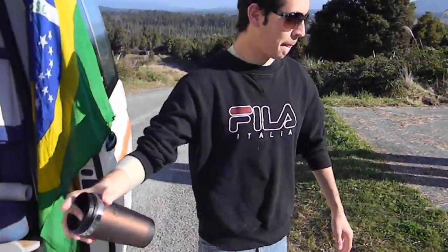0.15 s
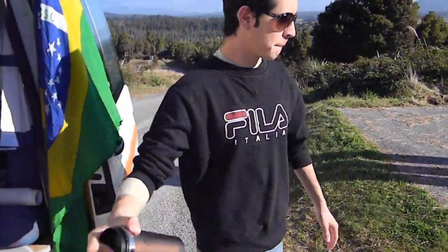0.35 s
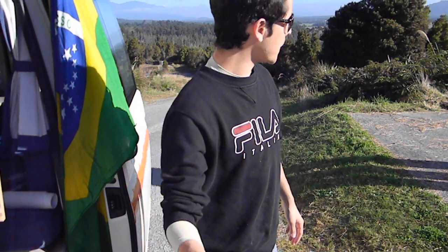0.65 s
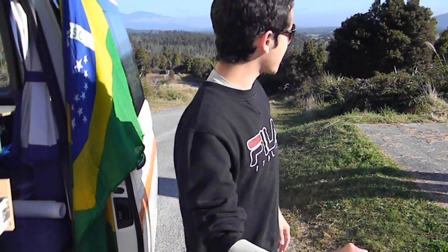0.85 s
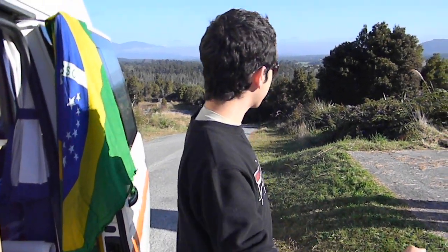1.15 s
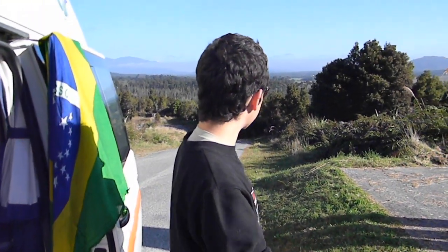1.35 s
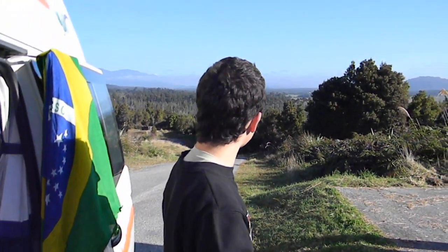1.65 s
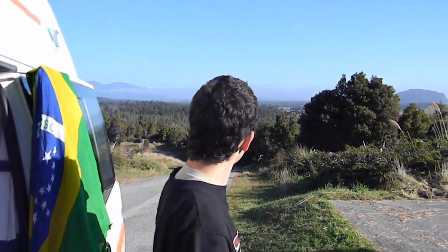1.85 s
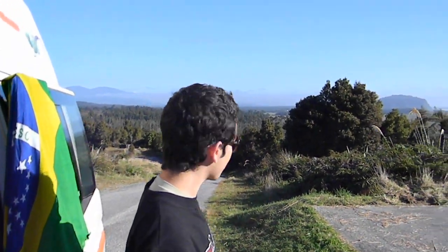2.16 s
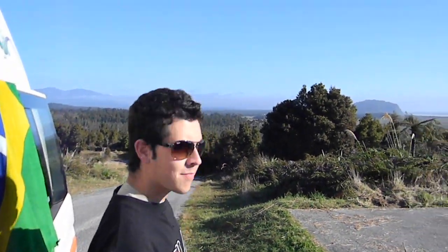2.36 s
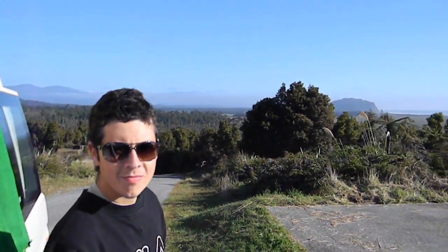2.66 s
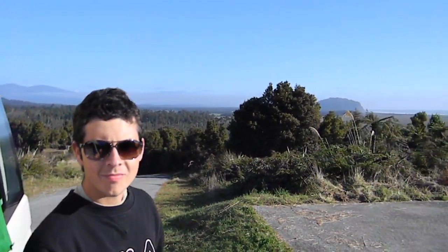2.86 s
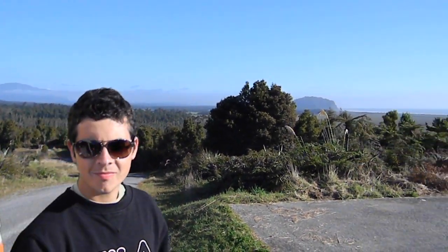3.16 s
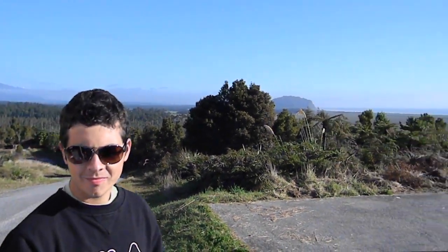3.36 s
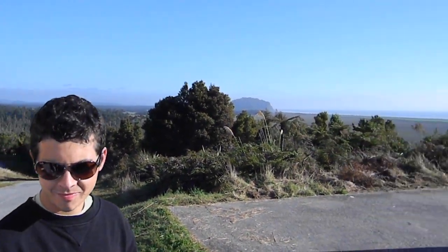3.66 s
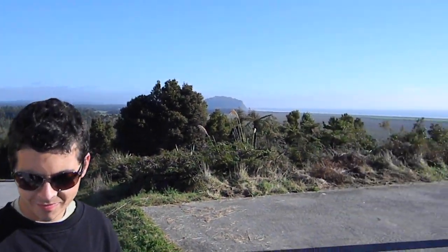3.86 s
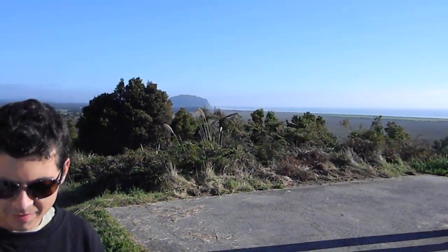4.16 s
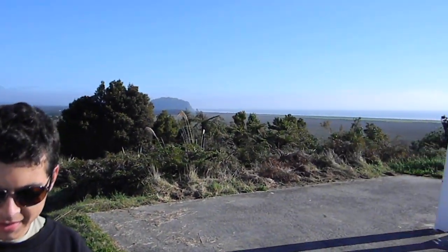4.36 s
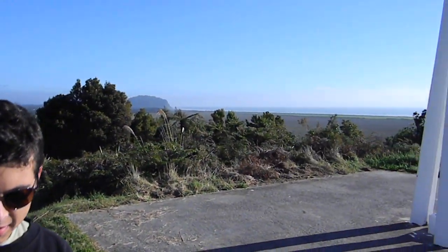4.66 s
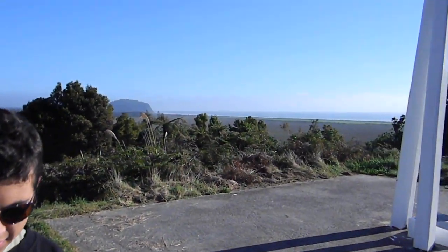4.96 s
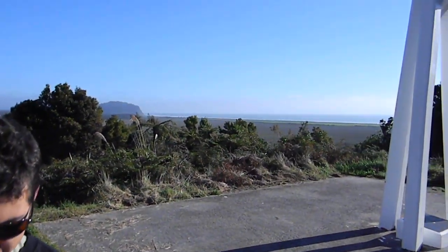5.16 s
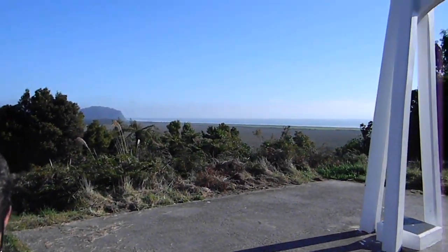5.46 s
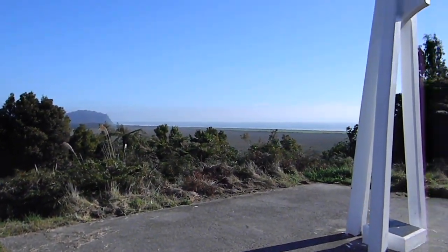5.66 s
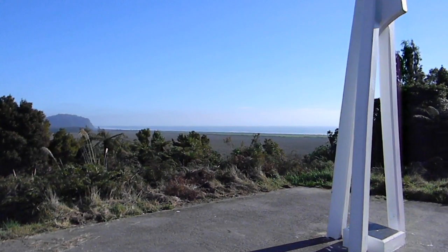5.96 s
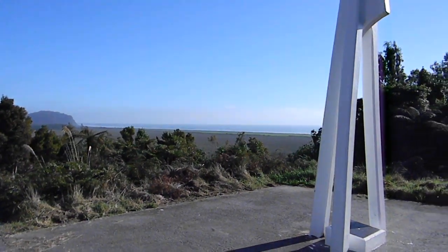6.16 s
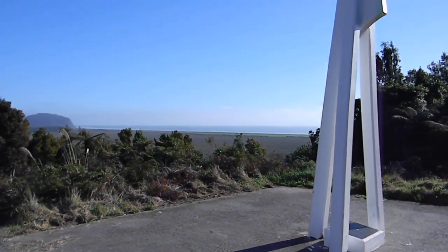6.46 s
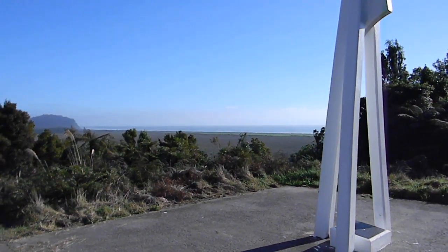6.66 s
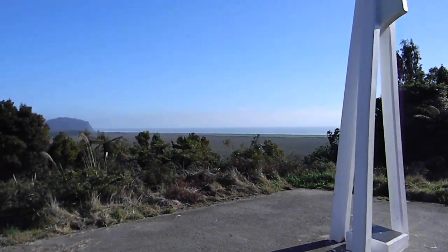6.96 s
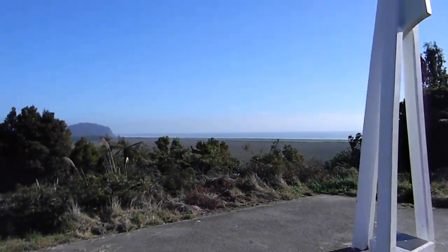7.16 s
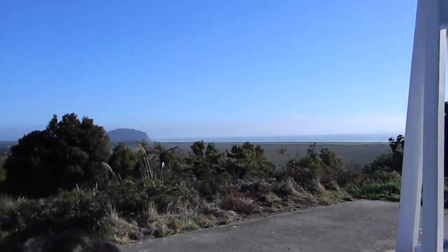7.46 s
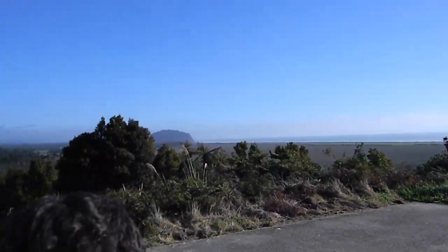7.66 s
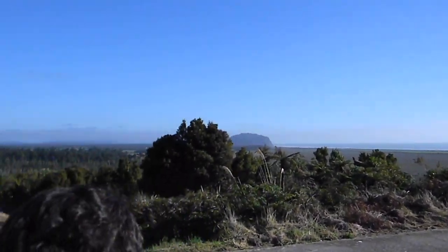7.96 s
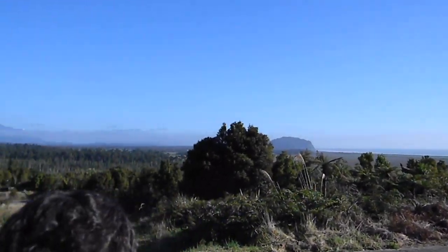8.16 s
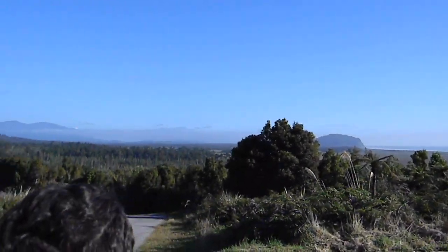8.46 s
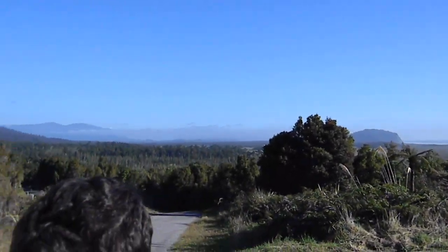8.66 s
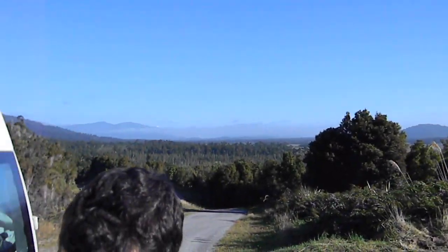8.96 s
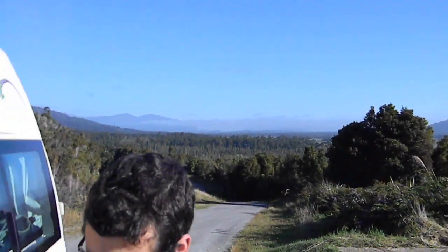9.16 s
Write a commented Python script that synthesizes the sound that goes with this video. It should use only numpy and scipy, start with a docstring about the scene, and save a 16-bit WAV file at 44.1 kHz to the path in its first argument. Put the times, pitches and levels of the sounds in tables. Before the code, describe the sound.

Very close to a handheld stereo microphone outdoors, ice and liquid are shaken hard in a closed metal shaker, about five sharp crashes a second, each with a softer return. After four seconds it stops. A few gurgling sloshes and dull handling knocks follow over light wind and a faint distant bird trill, then a last bubbling swirl with clinking ice.

```python
"""Ice and drink are shaken hard in a closed metal shaker, outdoors, close to a handheld camera's two ports.
On each stroke one chunk strikes the end, the rest shower after it, the drink follows and the return is softer.
Then come slow, gurgling sloshes, dull knocks and a last swirl, over light wind and a faint, far, high trill.
Ice and drink are random collisions filtered by the shaker's resonances; bubbles and trill are gliding sines;
wind is filtered noise, partly alike at the two ports."""
import sys
import numpy as np
from scipy import signal
from scipy.fft import irfft
from scipy.io import wavfile
from scipy.ndimage import uniform_filter1d

SR = 44100
rng = np.random.default_rng(int(sys.argv[2]) if len(sys.argv) > 2 else 0)


def wav_record(signal):
    """Record a signal, one row per channel, as 16-bit PCM in the file named by sys.argv[1]."""
    frames = np.transpose(np.atleast_2d(signal))
    bounded = np.clip(frames, -1, 1)
    # unit amplitude maps onto the largest positive 16-bit level
    quanta = np.round(bounded * 32767).astype(np.int16)
    wavfile.write(sys.argv[1], SR, quanta)


N = 411012
TAPS = 2048  # length of filters, clacks and wind frames, in samples
HZ = np.fft.rfftfreq(TAPS, 1 / SR)

# shakes, one row each, levels ahead of each layer's trim: (first chunk strikes [s], chunk level [dB],
# shower level [dB], treble [dB], puff of air level [dB], load lands back [s], return level [dB])
STROKES = [(-.09, -10, -21, 0, -50, .003, -25), (.119, -14, -21.5, 0, -55, .212, -29.5),
           (0.3202, -15, -20, 6, -46, .424, -29), (0.522, -14, -21.5, -1, -47, .637, -28.5),
           (0.7313, -13, -20, 0.5, -50, .859, -27), (0.9605, -17, -19.5, 2, -42, 1.075, -27),
           (1.1715, -15, -24, 1, -38, 1.276, -27.5), (1.3899, -13, -21.5, 1.5, -58, 1.486, -25.5),
           (1.5952, -19.5, -20, 3, -56, 1.704, -27.5), (1.8218, -17, -21.5, -2.5, -58, 1.924, -29),
           (2.0361, -16.5, -24, 7.5, -36.5, 2.147, -28.5), (2.2533, -18.5, -23.5, -6, -58, 2.352, -28.5),
           (2.4626, -15, -22, 3, -61, 2.56, -28.5), (2.6656, -15, -25, 4, -44, 2.768, -30),
           (2.885, -15, -21, 1, -34, 2.99, -31.5), (3.09, -18.5, -21.5, 5, -44, 3.196, -29),
           (3.3112, -15.5, -23, 4.5, -43, 3.4, -30), (3.5118, -16.5, -24, 0, -42.5, 3.605, -29),
           (3.7217, -19.5, -23.5, 0, -52, 3.813, -29), (3.9216, -16.5, -21, 0.5, -31.5, 4.008, -27),
           (4.117, -17.5, -23, -0.5, -38, 4.214, -30)]
# slow sloshes, each trapping air, levels ahead of each layer's trim:
# (time [s], level [dB], length [s], air pocket resonance [Hz], bubble level [dB])
SLOSH_EVENTS = [(4.845, -29, 0.028, 1450, -35), (4.897, -34.5, 0.016, 1220, -48),
                (5.075, -32, 0.025, 1770, -23), (5.194, -28.5, .024, 1264, -35),
                (5.308, -33, 0.034, 1250, -27), (5.348, -38, 0.048, 1240, -28),
                (5.393, -39.5, 0.035, 1256, -19.5), (5.429, -36, .045, 1350, -23),
                (8.173, -35, 0.033, 2510, -14.5), (8.233, -30, 0.034, 1950, -24),
                (8.321, -30.5, 0.066, 2430, -27), (8.389, -29.5, .04, 1380, -18.5),
                (8.42, -35.5, .04, 2600, -32), (8.496, -34.5, 0.039, 850, -21),
                (8.531, -30.5, 0.059, 827, -17.5), (8.581, -33, 0.024, 1050, -21),
                (8.635, -30.5, 0.032, 985, -35), (8.698, -24.5, .06, 856, -14), (8.741, -31, .05, 915, -12),
                (8.779, -24.5, 0.042, 1036, -17), (8.805, -32, 0.031, 1480, -16),
                (8.832, -25, 0.049, 1030, -19), (8.901, -31.5, .06, 1390, -15.5),
                (8.96, -29, .04, 1550, -19), (9.024, -31, 0.046, 1440, -23), (9.2, -30.5, 0.054, 1470, -25)]
SLOSH_RISE_SHARE = 0.36  # share of a slosh spent swelling
# relative spectrum of dull handling: (frequency [Hz], level per Hz [dB])
DULL_SPECTRUM = [(80, -23), (200, -3), (290, -8), (400, 4.5), (660, -1.5), (900, -6), (1450, -10),
                 (2100, -16.5), (16000, -53)]


def gain_of(db):
    """Amplitude factor of a level in dB."""
    return 10 ** (np.asarray(db) / 20)


def evened(x):
    """The signal scaled to unit power."""
    return x / np.sqrt(np.mean(x ** 2) + 1e-20)


def read(points, hz=HZ):
    """A spectrum joined by straight lines on a log-frequency axis."""
    f, value = np.transpose(points)
    return np.interp(np.log(hz + 1), np.log(f + 1), value)


def curve(points):
    """A control joined by straight lines in time."""
    return np.interp(np.arange(N) / SR, *np.transpose(points))


def add(mix, s, sound):
    """Lay a sound into the mix at time s, cutting what falls outside."""
    at = round(s * SR)
    sound = sound[:, max(-at, 0):]
    part = mix[:, max(at, 0):][:, :sound.shape[1]]
    part += sound[:, :part.shape[1]]


def bump(hz, width, db):
    """The dB curve of one resonance."""
    return db / (1 + (2 * (HZ - hz) / width) ** 2)


def tilt(bass_db, treble_db):
    """Heavy lumps add bass, sharp corners add treble."""
    return read([(500, bass_db), (1100, 0), (2600, 0), (6000, treble_db)])


def colour(x, db, s):
    """A causal filter of unit power, heard at two ports with the level and delay between them at time s."""
    # where the shaker is: (time [s], left over right [dB], lag of left [ms])
    shaker_place = [(0, -1, 0.042), (.7, -3, 0.024), (1.048, -6, 0.17), (2.3, -3.5, 0.16), (2.6, -1, 0.039),
                    (9.3, 0.6, 0)]
    # microphone pair: (frequency [Hz], phase by which left leads [rad])
    port_lead = [(20, -3), (340, -.5), (950, 0.06), (2300, 0.65), (4500, 2.22), (9000, 1.5), (16000, 1.5)]
    # microphone pair: (frequency [Hz], left over right [dB])
    port_balance = [(100, 1.5), (400, 3), (1300, 0), (2500, -0.6), (4400, -1.5), (8000, 4), (15000, 4.5)]
    times, *place = np.transpose(shaker_place)
    pan_db, lag_ms = (np.interp(s, times, column) for column in place)
    log_gain = np.log(gain_of(np.maximum(db - db.max(), -100)))
    # the minimum phase follows from the log gain
    phase = -signal.hilbert(np.r_[log_gain, log_gain[-2:0:-1]]).imag[:len(HZ)]
    lead = read(port_lead) - 2 * np.pi * HZ * lag_ms / 1000
    side = np.array([[.5], [-.5]])  # half of each difference goes to each port
    port_gain = gain_of(side * (pan_db + read(port_balance)))
    ports = np.exp(log_gain + 1j * (phase + side * lead)) * port_gain
    margin = 32  # samples of room for the port that leads
    taps = np.roll(irfft(ports), margin, axis=1)
    taps /= np.sqrt(np.sum(taps ** 2) / 2)
    return signal.oaconvolve(x, taps, axes=1)[:, margin:]


def clack(ring_s, direct, same, tail_db=-14, tail_s=0.009, chunk_db=-9, chunk_s=0.008, count=8):
    """One collision: a sharp contact, a dense ring of the vessel, the chunk's own modes and weak reflections."""
    t = np.arange(TAPS) / SR
    shared, own, late = rng.standard_normal((3, 2, TAPS))
    same = np.clip(same, 0, 1)  # share of the ring's power common to both ports
    ring = np.sqrt(same) * shared[0] + np.sqrt(1 - same) * own
    ring = evened(ring * np.exp(-t / ring_s))
    contact = evened(1. * (t == 0))
    mode_hz = rng.uniform(1532, 15000, (count, 1))
    modes = np.sin(2 * np.pi * mode_hz * t).sum(0) * np.exp(-t / chunk_s)
    sound = ring + direct * contact + gain_of(chunk_db) * evened(modes)
    reflections = evened(late * np.exp(-t / tail_s))
    return evened(sound + gain_of(tail_db) * reflections) / np.sqrt(TAPS)


def rattle(envelope, per_s, spread_db, ring_s, same, fizz_db=-6, count=4):
    """Random collisions of several chunks, mostly small and a few large, in a fine fizz of slush."""
    n = len(envelope)
    size = gain_of(spread_db * np.minimum(rng.exponential(1, n), 3.5)) * rng.choice([-1, 1], n)
    clicks = size * (rng.random(n) < per_s / SR) * envelope
    clicks = evened(clicks) * np.sqrt(np.mean(envelope ** 2))
    chunk = rng.integers(0, count, n)
    out = 0
    for k in range(count):
        own_clicks = (clicks * (chunk == k))[None]
        out = out + signal.oaconvolve(own_clicks, clack(ring_s, 0.39, same), axes=1)
    # crumbs and froth are mostly treble
    fizz = np.diff(rng.standard_normal((2, n + 1)) + rng.standard_normal(n + 1))
    out[:, :n] += gain_of(fizz_db) * envelope * evened(fizz)
    return out


def surge(s, db, rise, fall, shape=1.165):
    """Start time and envelope of a load that piles up and settles around time s."""
    rise, fall = max(rise, .001), max(fall, .002)
    t = np.arange(-4 * rise, 4 * fall, 1 / SR)
    return s + t[0], gain_of(db) * np.exp(-np.maximum(-t / rise, t / fall) ** shape)


def shaker_db():
    """The colour of ice heard through the shaker's walls."""
    # relative spectrum of ice: (frequency [Hz], level per Hz [dB])
    ice_spectrum = [(88, -30.5), (150, -6.5), (303, -11.5), (439, 0.5), (716, -1), (1480, -2), (1790, -3.5),
                    (2270, -3.5), (2810, -6), (3490, -9), (5150, -12.5), (15100, -38), (16000, -27)]
    # resonances of the shaker, damped by hand and drink: (frequency [Hz], width [Hz], height [dB])
    wall_modes = [(1030, 260, 2.5), (1454, 200, 1.5), (2390, 69, 2), (3500, 1300, 1), (4560, 140, 4)]
    return read(ice_spectrum) + sum(bump(*mode) for mode in wall_modes)


def bass_at(s):
    """The level of the bass in the shaker at time s."""
    # bass of the strokes: (time [s], level [dB])
    stroke_bass = [(0, 5), (.53, 7), (.75, 3.5), (1, -2.5), (2.2, -2.5), (3.3, -0.5), (4.1, 1.5)]
    return np.interp(s, *np.transpose(stroke_bass))


def blows(rows, body, ring_s, direct, same, level_db):
    """Single hard contacts, each level taken as if the blow's energy filled four milliseconds."""
    out, size = np.zeros((2, N)), np.sqrt(.004 * SR)
    for s, db, bass_db, treble_db in rows:
        blow = colour(clack(ring_s, direct, same), body + tilt(bass_db, treble_db), s)
        add(out, s, gain_of(db + level_db) * size * blow / np.sqrt(np.sum(blow ** 2) / 2))
    return out


def chunks(lead_treble_db=-1, stray_treble_db=0):
    """The first chunk of every stroke and the stray ones strike the wall singly."""
    # stray chunks off the beat, ahead of the trim below: (time [s], level [dB])
    stray_hits = [(.2075, -22), (.2885, -27), (0.3344, -18.5), (0.4209, -15.5), (0.5544, -22),
                  (0.6316, -21), (1.063, -19.5), (1.1799, -16), (1.2487, -24), (1.266, -22), (1.833, -21),
                  (2.051, -16), (2.2635, -18.5), (2.678, -17.5), (3.9927, -31), (4.2028, -32),
                  (8.6962, -35), (8.7784, -20), (8.8515, -32), (8.9741, -27.5)]
    leading = [(s, db, bass_at(s), treble_db + lead_treble_db) for s, db, _, treble_db, *_ in STROKES]
    stray = [(s, db, bass_at(s), stray_treble_db) for s, db in stray_hits]
    return blows(leading + stray, shaker_db(), ring_s=0.004, direct=0.42, same=0.8, level_db=-1.0)


def shaking(ice_per_s=700, drink_per_s=900, return_per_s=450):
    """Each shake lands as three showers of collisions: the ice, the drink behind it, and the return."""
    shower_lag_s, shower_rise_s, shower_fall_s = .008, .015, .015  # the rest of the ice, after the first chunk
    drink_db, drink_lag_s, drink_rise_s, drink_fall_s = -30, .031, .012, .019  # drink and slush follow
    return_rise_s, return_fall_s = .032, .029  # the soft landing at the other end
    return_bass_db, return_treble_db = 3, -1
    return_bass_share = 0.13  # how far the returns follow the level of the bass
    out, body = np.zeros((2, N)), shaker_db()
    for s, _, shower_db, treble_db, _, back_s, back_db in STROKES:
        ice = surge(s + shower_lag_s, shower_db, shower_rise_s, shower_fall_s)
        drink = surge(s + drink_lag_s, drink_db, drink_rise_s, drink_fall_s)
        back = surge(back_s, back_db, return_rise_s, return_fall_s)
        hard = tilt(bass_at(s), treble_db)
        soft = tilt(return_bass_db + return_bass_share * bass_at(back_s), return_treble_db)
        loads = (ice, ice_per_s, hard), (drink, drink_per_s, hard), (back, return_per_s, soft)
        for (start, envelope), per_s, tone in loads:
            shower = rattle(envelope, per_s, spread_db=3.0, ring_s=0.0033, same=0.55, fizz_db=-5)
            add(out, start, colour(shower, body + tone, s))
    return out


def dripping(glint_hz=10500, glint_width=3000, glint_db=11):
    """Loose bits of ice tick brightly and drops run back, as a sparse rattle that never stops."""
    # small ice and drops that keep moving: (time [s], level [dB])
    drip_level = [(0, -43.5), (4.24, -48.5), (4.42, -55.5), (7.6, -57.5), (8.1, -46), (8.4, -45),
                  (8.9, -41), (9.1, -43.5), (9.32, -43.5)]
    ticks = rattle(gain_of(curve(drip_level)), per_s=170, spread_db=3.0, ring_s=0.0059, same=0.1, fizz_db=-1)
    tone = shaker_db() + tilt(-1.8, -2.3) + bump(glint_hz, glint_width, glint_db)
    return colour(ticks, tone, N / SR / 2)[:, :N]


def steel(x, ring_db=-12, ring_s=0.0083, count=110):
    """The thin steel wall adds many faint, close modes that outlast each blow."""
    t = np.arange(SR // 8) / SR
    hz = rng.uniform(2000, 14000, (count, 1))
    size, turn = rng.random((2, count, 1)), rng.random((2, count, 1))
    ring = (size * np.sin(2 * np.pi * hz * t + np.pi * turn)).sum(1) * np.exp(-t / ring_s)
    return x + gain_of(ring_db) * signal.oaconvolve(x, evened(ring) / np.sqrt(len(t)), axes=1)[:, :N]


def clinking(ice, per_s=330, low_hz=2500, high_hz=11500, ring_s=0.0062, spread_db=3.0, db_per_octave=-5):
    """Chunks that touch each other ring briefly, each at its own pitch, as hard as the ice is moving."""
    # how freely the chunks ring, most in the last swirl, ahead of pitch and chance:
    # (time [s], level against the moving ice [dB])
    clink_level = [(0, -15.5), (5.5, -15), (8.2, -8)]
    motion = np.sqrt(abs(uniform_filter1d((ice ** 2).mean(0), size=500))) * gain_of(curve(clink_level))
    out, t = np.zeros((2, N)), np.arange(SR // 16) / SR
    for when, pitch, chance, left, right in rng.random((int(per_s * N / SR), 5)):
        at, octaves = int(when * N), pitch * np.log2(high_hz / low_hz)
        size = motion[at] * gain_of(db_per_octave * octaves - spread_db * np.log(max(chance, .05)))
        ring = np.sin(2 * np.pi * low_hz * 2 ** octaves * t) * np.exp(-t / ring_s)
        add(out, at / SR, size * (.5 + np.array([[left], [right]])) * ring)
    return out


def wind(spectrum, patchy_db, swell_db, alike=1):
    """Noise with drifting patches and a slow swell, partly alike at the two ports."""
    # likeness of the outdoor air at the two ports, scaled by alike: (frequency [Hz], likeness [-1 to 1])
    port_likeness = [(40, 0.96), (130, 1), (280, 0.35), (500, 0.083), (2000, 0.067), (9000, 0.048)]
    frames = N // (TAPS // 4) + 5
    a, b, c, d, patches = rng.standard_normal((5, frames, len(HZ)))
    patches = uniform_filter1d(patches, size=8, axis=0)  # along time
    patches = evened(uniform_filter1d(patches, size=20, axis=1))  # along frequency
    swell = evened(uniform_filter1d(rng.standard_normal((frames, 1)), size=30, axis=0))
    same, left = np.clip(alike * read(port_likeness), -1, 1), a + 1j * b
    right = same * left + np.sqrt(1 - same ** 2) * (c + 1j * d)
    z = np.array([left, right])
    z *= gain_of(read(spectrum) + patchy_db * patches + swell_db * swell)
    noise = signal.istft(z.transpose(0, 2, 1), nperseg=TAPS, noverlap=TAPS * 3 // 4)[1]
    return evened(noise[:, :N])


def outdoor_air(level_db=-42.5):
    """Light wind around the place: steady noise with a gentle swell."""
    # relative spectrum of the outdoor air: (frequency [Hz], level per Hz [dB])
    air_spectrum = [(20, -31), (50, -13.5), (100, 2), (165, -3), (215, -8.5), (290, -14), (400, 0),
                    (600, -6.5), (1000, -10.5), (2000, -18.5), (5500, -29.5), (7200, -28.5), (12500, -41.5),
                    (15500, -33)]
    return gain_of(level_db) * wind(air_spectrum, patchy_db=1.5, swell_db=.6)


def buffeting(puff_s=0.047, puff_lag_s=0.022):
    """The swinging arm stirs the air at the ports, with a low puff on each stroke."""
    # relative spectrum of the stirred air: (frequency [Hz], level per Hz [dB])
    buffet_spectrum = [(20, -17), (45, 0), (90, 1.5), (150, -2), (230, -14.5), (400, -21), (1000, -70)]
    # stirring between the puffs: (time [s], level [dB])
    stir_level = [(0, -58), (4.2, -47.5), (4.4, -54), (8.4, -67), (9.3, -50)]
    t = np.arange(N) / SR
    power = gain_of(curve(stir_level)) ** 2
    for s, _, _, _, puff_db, *_ in STROKES:
        power += gain_of(puff_db) ** 2 * np.exp(-((t - s - puff_lag_s) / puff_s) ** 2)
    return np.sqrt(power) * wind(buffet_spectrum, patchy_db=2, swell_db=0, alike=.5)


def trill(level_db=-63, centre_hz=6850, swing_hz=420, notes_per_s=17, blur_s=.004):
    """A far small bird twitters in quick falling notes, blurred by the bushes."""
    # the bird comes and goes, ahead of the overall level: (time [s], relative level [dB])
    bird_level = [(4.2, -1.5), (6, -7.5), (7.2, -5.5), (8, -12)]
    waver, loudness = (evened(signal.resample(rng.standard_normal(count), N)) for count in (500, 300))
    note = np.cumsum(notes_per_s * (1 + 0.04 * waver)) / SR % 1  # position within each note
    hz = centre_hz + swing_hz * (1 - 2 * note) + 110 * waver
    swell = np.sin(np.pi * note) * gain_of(loudness + curve(bird_level))
    song = swell * np.sin(2 * np.pi * np.cumsum(hz) / SR)
    bushes = rng.standard_normal((2, TAPS)) * np.exp(-np.arange(TAPS) / SR / blur_s)
    return gain_of(level_db) * evened(signal.oaconvolve(song[None], bushes, axes=1)[:, :N])


def knocking(bass_db=-7.5):
    """Dull knocks ring a few low, quickly damped resonances."""
    # dull knocks, ahead of the trim below: (time [s], level [dB], treble [dB])
    knock_events = [(3.4105, -21, 4), (5.0363, -49, 2), (6.061, -17, -26), (7.5686, -31, -1),
                    (7.5938, -23, 8.5), (8.2561, -23.5, 7), (9.1905, -32, -12)]
    # resonances that a knock on the handheld body rings: (frequency [Hz], width [Hz], height [dB])
    body_modes = [(441, 86, 5.5), (660, 100, 8.5), (1530, 340, 5)]
    body = read(DULL_SPECTRUM) + sum(bump(*mode) for mode in body_modes)
    rows = [(s, db, bass_db, treble_db) for s, db, treble_db in knock_events]
    return blows(rows, body, ring_s=0.0081, direct=0.74, same=0.73, level_db=1.0)


def sloshing(level_db=-1, pocket_width=0.34, splash_hz=3500, splash_width=2500, splash_db=3):
    """Drink and slush run along the wall and ring the air pocket that they enclose."""
    pocket_db, slosh_bass_db, slosh_treble_db = 6.5, -2, 2
    # a pocket smaller than the usual one goes with a brighter splash
    usual_pocket_hz, treble_db_per_octave = 1300, 9
    # the splash itself sits in the low treble
    out, body = np.zeros((2, N)), shaker_db() + bump(splash_hz, splash_width, splash_db)
    for s, db, length, pocket_hz, _ in SLOSH_EVENTS:
        rise = SLOSH_RISE_SHARE * length
        start, envelope = surge(s, db + level_db, rise, length - rise)
        slush = rattle(envelope, per_s=1500, spread_db=3.5, ring_s=0.0021, same=0.62, fizz_db=-9)
        pocket = bump(pocket_hz, pocket_width * pocket_hz, pocket_db)
        treble_db = slosh_treble_db + treble_db_per_octave * np.log2(pocket_hz / usual_pocket_hz)
        add(out, start, colour(slush, body + tilt(slosh_bass_db, treble_db) + pocket, s))
    return out


def bubble(db, hz, cycles=9, climb_per_s=0.8):
    """A bubble rings for a few cycles and climbs in pitch as it nears the surface."""
    t = np.arange(SR // 12) / SR
    turns = hz * (t + climb_per_s * t ** 2 / 2)
    ring = np.sin(2 * np.pi * turns) * (1 - np.exp(-turns)) * np.exp(-turns / cycles)
    return gain_of(db) * np.array([ring, ring])


def gurgling(level_db=-3, small_db=2, small_octaves=1.62, count=4):
    """Each slosh pinches off its air pocket as one large bubble and sheds smaller ones, tending higher."""
    out = np.zeros((2, N))
    all_draws = rng.random((len(SLOSH_EVENTS), count, 2))
    for (s, db, length, hz, bubble_db), draws in zip(SLOSH_EVENTS, all_draws):
        add(out, s, bubble(bubble_db + level_db, hz))
        for when, size in draws:
            small_hz = hz * 2 ** (small_octaves * when * size)
            add(out, s + length * (when - SLOSH_RISE_SHARE), bubble(db + small_db, small_hz))
    return out


def handling(rise_share=0.32, bass_db=0, treble_db=3):
    """Soft scuffs: sparse, dull little bumps."""
    # dull scuffs of handling: (time [s], level [dB], length [s])
    scuff_events = [(4.993, -34, .034), (5.04, -34, .035), (5.308, -29.5, 0.038), (5.936, -32, 0.03),
                    (5.972, -28, .04), (6.062, -31.5, 0.062), (6.339, -43, .06), (6.539, -39.5, .09),
                    (6.799, -36, 0.036), (7.117, -32.5, 0.03), (7.245, -34, 0.059), (7.321, -36, 0.021),
                    (7.366, -36.5, .03), (7.512, -32, .04), (7.6, -35, 0.09), (7.709, -39, 0.071)]
    out = np.zeros((2, N))
    for s, db, length in scuff_events:
        start, envelope = surge(s, db, rise_share * length, (1 - rise_share) * length)
        bumps = rattle(envelope, per_s=490, spread_db=0.5, ring_s=0.0025, same=0.43)
        add(out, start, colour(bumps, read(DULL_SPECTRUM) + tilt(bass_db, treble_db), s))
    return out


def scene():
    """The shaker and the hands, close up, over the outdoor air."""
    ice = chunks() + shaking() + dripping() + sloshing()
    shaker = steel(ice) + clinking(ice) + gurgling()
    air = outdoor_air() + buffeting() + trill()
    return shaker + air + knocking() + handling()


def record(dry):
    """The camera's band limit: a steep low-pass filter."""
    edge_hz = 15950
    low_pass = signal.firwin(511, edge_hz, window=("kaiser", 9), fs=SR)
    return signal.oaconvolve(dry, low_pass[None], "same")


dry = scene()
out = record(dry)
wav_record(out)
```